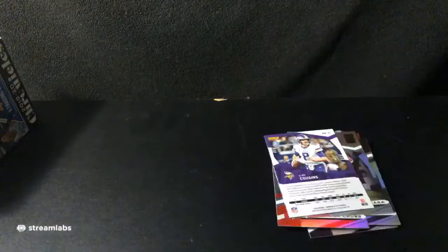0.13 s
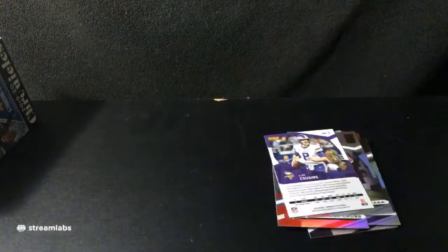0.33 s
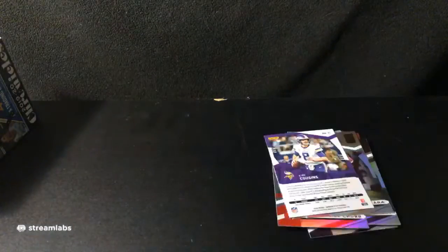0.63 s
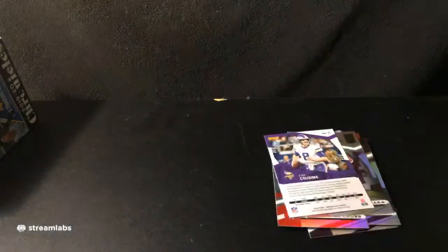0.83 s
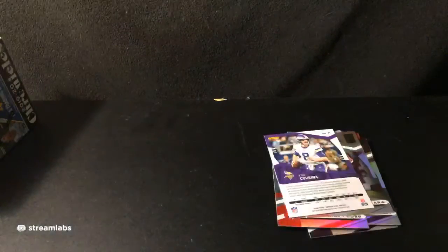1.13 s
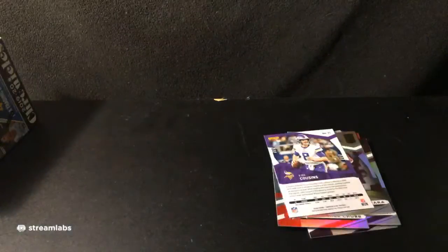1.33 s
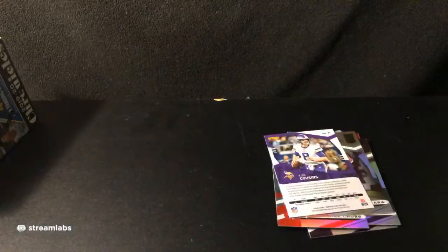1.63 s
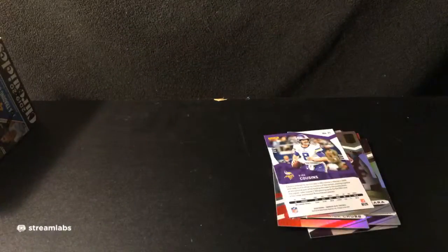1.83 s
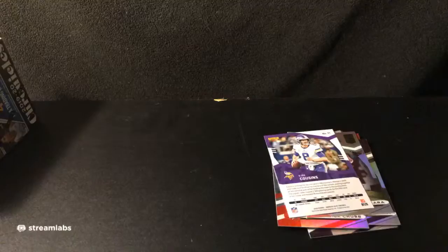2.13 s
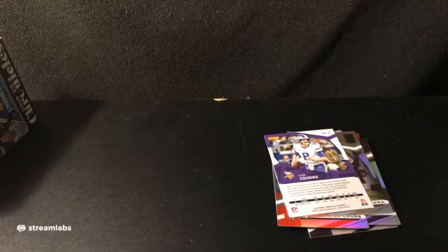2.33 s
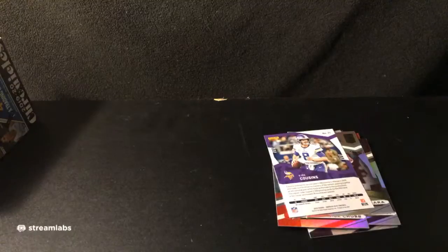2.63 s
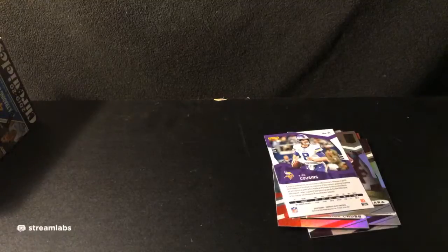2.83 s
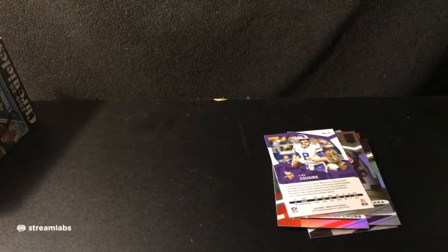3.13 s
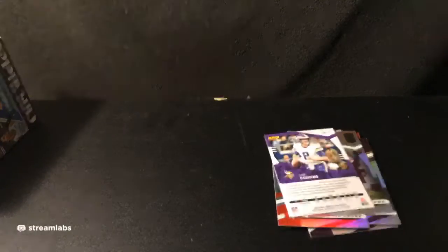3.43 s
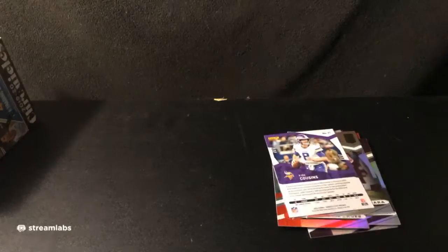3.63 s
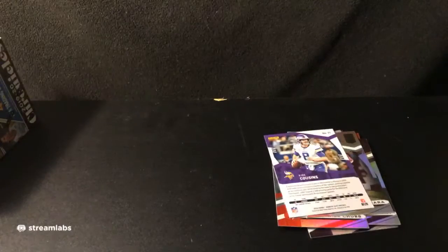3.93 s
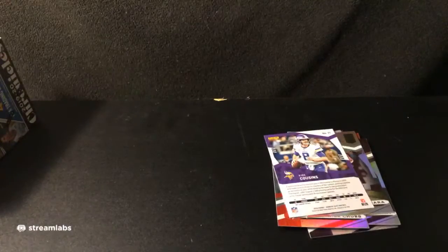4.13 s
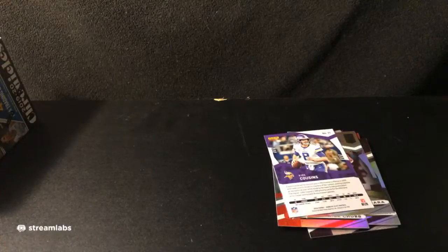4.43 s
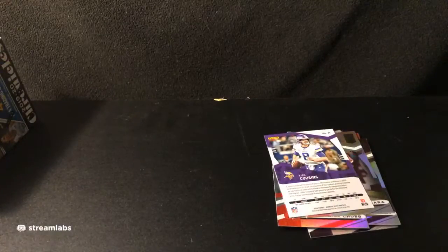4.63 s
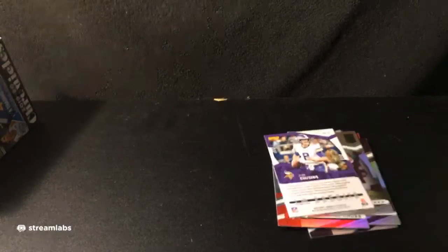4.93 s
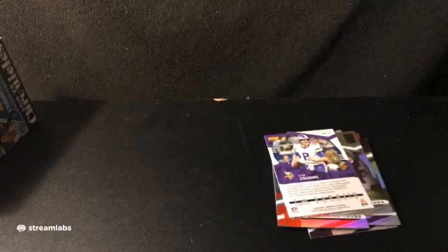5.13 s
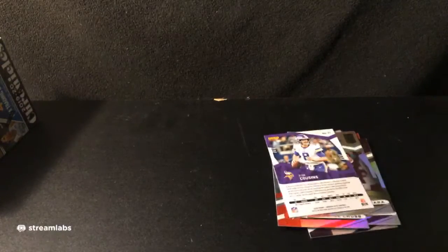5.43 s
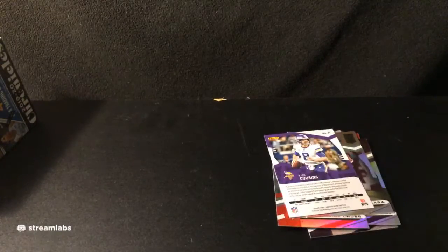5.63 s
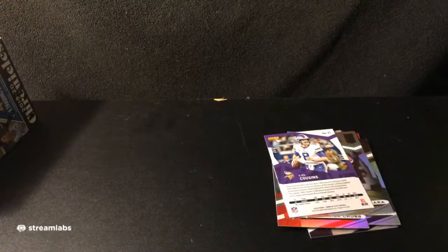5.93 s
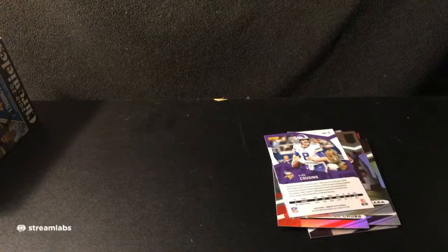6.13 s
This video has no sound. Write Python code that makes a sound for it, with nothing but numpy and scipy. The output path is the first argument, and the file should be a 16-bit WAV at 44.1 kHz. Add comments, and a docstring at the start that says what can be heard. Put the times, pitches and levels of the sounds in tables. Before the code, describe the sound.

A hollow bump, then three dull thudding knocks on a table, the first by far the loudest, over steady faint microphone hiss.

```python
"""Bump and knocks on a table

A hollow bump, then three dull knocks on a table, heard through a microphone that stands on it.
Each knock is a filtered impulse that the table top disperses, treble first and bass last, so it falls
from a tick to a thud; a faint rebound follows. The bump sums swelling modes, a noise scuff and a click.
Two soft nudges are brief low sines; under it all lie steady coloured noise and two thin tones."""
import sys
import numpy as np
from scipy.fft import rfft, irfft, next_fast_len
from scipy.io import wavfile

SR = 44100
rng = np.random.default_rng(int(sys.argv[2]) if len(sys.argv) > 2 else 0)


def master(y):
    """Save y as 16-bit WAV."""
    cut = np.clip(np.atleast_2d(y).T, -1, 1)
    pcm = np.round(cut * 32767)  # scale
    wavfile.write(sys.argv[1], SR, pcm.astype(np.int16))


N = 276948  # length in samples


def amp(db):
    """Amplitude ratio: 20 dB make a factor of ten."""
    return 10 ** (np.asarray(db) / 20)


def unit(x):
    """Normalisation by mean power: x at rms 1."""
    return x / np.sqrt(np.mean(x ** 2) + 1e-20)


def along(points, hz):
    """Spectral envelope: (Hz, value) points interpolated on a logarithmic frequency axis."""
    f, v = np.transpose(points)
    return np.interp(np.log(hz + 1), np.log(f + 1), v)


def filtered(x, response):
    """Linear filtering: the spectrum of x times a response of frequency."""
    size = next_fast_len(len(x) + SR // 4)  # padding keeps the tail from wrapping round
    hz = np.fft.rfftfreq(size, 1 / SR)
    return irfft(rfft(x, size) * response(hz), size)[:len(x)]


def noise(spectrum, size):
    """Coloured noise: white Gaussian noise shaped by a spectral envelope in dB, at rms 1."""
    white = rng.standard_normal(size)
    return unit(filtered(white, lambda hz: amp(along(spectrum, hz))))


def causal(gain):
    """Minimum phase: folding the cepstrum gives the causal response with this gain."""
    cepstrum = irfft(np.log(np.maximum(gain, 1e-6)))
    half = len(cepstrum) // 2
    cepstrum[1:half] *= 2
    cepstrum[half + 1:] = 0
    return np.exp(rfft(cepstrum))


def swell(t, rise, t60):
    """Build-up and damping: a smooth rise, then an exponential decay of 60 dB in t60 seconds."""
    attack = np.sin(np.pi / 2 * np.minimum(t / rise, 1)) ** 2
    decay = np.exp(-np.log(1000) * np.maximum(t - rise, 0) / t60)
    return attack * decay


def add(track, s, sound):
    """Superposition: mix a sound into the track at s seconds."""
    part = track[round(s * SR):][:len(sound)]
    part += sound[:len(part)]


def hiss(level_db=-46.5):
    """Stationary noise: even, coloured microphone hiss with a trace of electrical whine."""
    # Spectrum of the hiss. Each row: frequency in Hz, relative level per hertz in dB.
    hiss_spectrum = [(12, -51), (20, -37), (49, -13), (91, -11.5), (118, -7.5), (193, -8), (396, -7.5),
                     (428, -7.5), (583, -8), (880, -7.5), (1590, -8), (2660, 1), (3440, -9), (8260, -28),
                     (9400, -33), (12200, -70), (20700, -120)]
    # Thin electrical tones. Each row: frequency in Hz, rms level in dB.
    whine_tones = [(4382, -85), (5841, -90.5)]
    t = np.arange(N) / SR
    whine = sum(np.sqrt(2) * amp(db) * np.sin(2 * np.pi * hz * t) for hz, db in whine_tones)
    return amp(level_db) * noise(hiss_spectrum, N) + whine


def nudges(rock_hz=54):
    """Damped oscillation: pushes so soft that the table only rocks for a moment."""
    # Soft pushes. Each row: start in seconds, level in dB.
    pushes = [(2.825, -53), (4.02, -52)]
    track, t = np.zeros(N), np.arange(SR // 2) / SR
    rock = swell(t, rise=.03, t60=.25) * np.sin(2 * np.pi * rock_hz * t)
    for s, db in pushes:
        add(track, s, amp(db) * rock)
    return track


def bump(s=.861, scuff_db=-25, click_s=.8795, click_db=-31, sway_db=-49, sway_hz=33):
    """Modal synthesis: a nudged hollow thing sums swelling modes, a scuff, a click and a brief table sway."""
    # Modes of the hollow thing. Each row: frequency in Hz, level in dB, swell in seconds, t60 in seconds.
    hollow_modes = [(87, -26.5, .036, 0.017), (202.8, -15, 0.018, 0.17), (214.2, -13.5, 0.0344, .04),
                    (237, -38, 0.053, .12), (255.5, -20, 0.0272, 0.015), (401, -26, 0.017, 0.011),
                    (701, -21, 0.0058, 0.065), (676.5, -20.5, 0.021, .036), (1016, -30.5, 0.0017, 0.042),
                    (1144, -32.5, 0.015, 0.022), (1670, -49.5, 0.023, .03)]
    # Spectrum of the contact scuff. Each row: frequency in Hz, relative level per hertz in dB.
    scuff_spectrum = [(100, -22), (300, 3), (750, 0), (1150, -3.5), (1400, -15.5), (2500, -26),
                      (5000, -51.5)]
    click_spectrum = [(500, -20), (1500, 5), (2700, -4.5), (5000, -26.5)]  # columns as for the scuff
    track, t = np.zeros(N), np.arange(SR // 2) / SR
    ring = np.zeros(len(t))
    for hz, db, rise, t60 in hollow_modes:
        ring += amp(db) * swell(t, rise, t60) * np.sin(2 * np.pi * hz * t)
    scuff = amp(scuff_db) * swell(t, rise=.0064, t60=.087) * noise(scuff_spectrum, len(t))
    click = amp(click_db) * swell(t, rise=.0005, t60=.008) * noise(click_spectrum, len(t))
    sway = amp(sway_db) * swell(t, rise=.05, t60=.45) * np.sin(2 * np.pi * sway_hz * t)
    add(track, s, ring + scuff + sway)
    add(track, click_s, click)
    return track


def dispersion(hz, lag_at_1k):
    """Dispersion: bending waves speed up with the root of frequency; resonances delay the bass further."""
    # Resonances that hold the wave back. Each row: centre in Hz, width in Hz.
    holds = [(115, 91), (460, 315)]
    # this phase gives a delay of lag_at_1k * sqrt(1000 / hz) seconds
    response = np.exp(-4j * np.pi * lag_at_1k * np.sqrt(1000 * hz))
    for centre, width in holds:
        pole = centre ** 2 - hz ** 2 + 1j * hz * width
        response = response * np.conj(pole) / pole  # all-pass: delay without change of level
    return response


def blow(soft_hz, thud_db, tick_db=-np.inf, tick_hz=2850, tick_width_hz=300, edge_s=.009, edge_top_hz=500):
    """Impulse response: one push through the table, at peak 1; softness costs treble, a hard tip ticks."""
    # Broad answer of the table beside its bass thud. Each row: frequency in Hz, relative level in dB.
    table_answer = [(10, -110), (50, -42), (130, -17), (220, -17), (350, -22), (550, -21.5), (750, -25.5),
                    (1100, -29), (1500, -40), (2800, -38.5), (4500, -61), (7000, -58), (9000, -67)]
    thud_hz, thud_octaves = 73, .43  # centre and spread of the bass peak
    echo = .15  # share that the table edge sends back, before its filter
    hz = np.fft.rfftfreq(2 * (SR // 6), 1 / SR)
    travel = dispersion(hz, lag_at_1k=.00067)
    # a broad bass peak makes a short thud
    thud = np.exp(-.5 * (np.log2((hz + 1) / thud_hz) / thud_octaves) ** 2)
    tick = 1 / (1 + ((hz - tick_hz) / tick_width_hz) ** 2)
    # the edge sends back all but the longest waves; the treble dies on the way
    edge = np.exp(-2j * np.pi * hz * edge_s) * hz ** 4 / (hz ** 4 + 170 ** 4)
    edge = edge / (1 + (hz / edge_top_hz) ** 2)
    contact = 1 / np.hypot(1, (hz / soft_hz) ** 2)
    gain = (amp(thud_db) * thud + amp(along(table_answer, hz)) + amp(tick_db) * tick) * contact
    wave = irfft(causal(gain) * travel * (1 + echo * edge))
    return wave / np.abs(wave).max()


def rebound(db, thud_db):
    """Contact softness: a light touch has no tick, and the weaker it is, the duller."""
    octaves = (db + 30) / 15  # 15 dB less halve the cut-off
    return amp(db) * blow(680 * 2 ** octaves, thud_db)  # 680 Hz at a peak of -30 dB


def knocks():
    """Successive impacts: a hard blow, a rebound as the hand falls back, and a settling touch if strong."""
    # Knocks. Each row: start in seconds, peak in dB, softness cut-off in Hz,
    # relative level of the tick in dB ahead of that softening, pause before the rebound in seconds.
    strikes = [(2.1463, 0.5, 2420, -42, .0715), (3.464, -12, 8400, -36.5, 0.077),
               (4.9655, -10.5, 7000, -39.5, .065)]
    rebound_loss_db, settle_loss_db = 27, 15.5  # first loss, further loss
    settle_pause = 1.14  # second pause over the first
    rest_db = -47  # at or below this peak the hand stays down
    knock_thud_db, rebound_thud_db, settle_thud_db = 1.7, -1.5, -10  # weight of the bass thud
    track = np.zeros(N)
    for s, db, soft_hz, tick_db, pause in strikes:
        add(track, s, amp(db) * blow(soft_hz, knock_thud_db, tick_db))
        rebound_db = db - rebound_loss_db
        add(track, s + pause, rebound(rebound_db, rebound_thud_db))
        settle_db = rebound_db - settle_loss_db
        if settle_db > rest_db:
            add(track, s + pause * (1 + settle_pause), rebound(settle_db, settle_thud_db))
    return track


def scene():
    """Superposition of the sources: the blows arrive through the table, with no room echo."""
    return (hiss() + nudges() + bump() + knocks())[None]


def record(dry):
    """Clipping and band limiting: peaks stop at full scale, then nothing passes above the top frequency."""
    top_hz = 9500
    clipped = np.clip(dry[0], -1, 1)
    return filtered(clipped, lambda hz: hz < top_hz)[None]


dry = scene()
out = record(dry)
master(out)
```